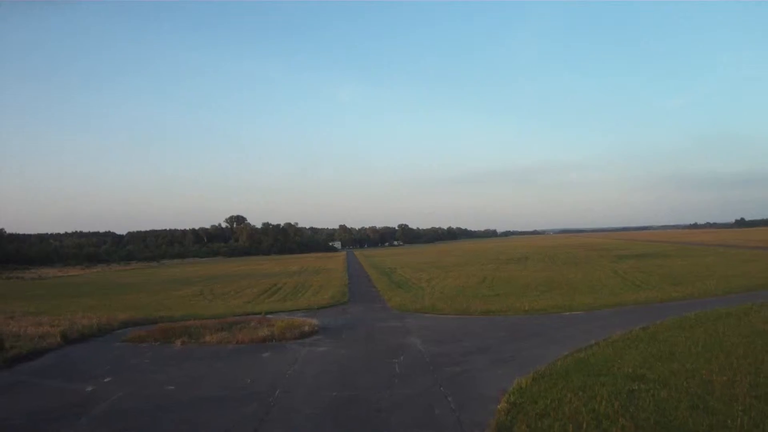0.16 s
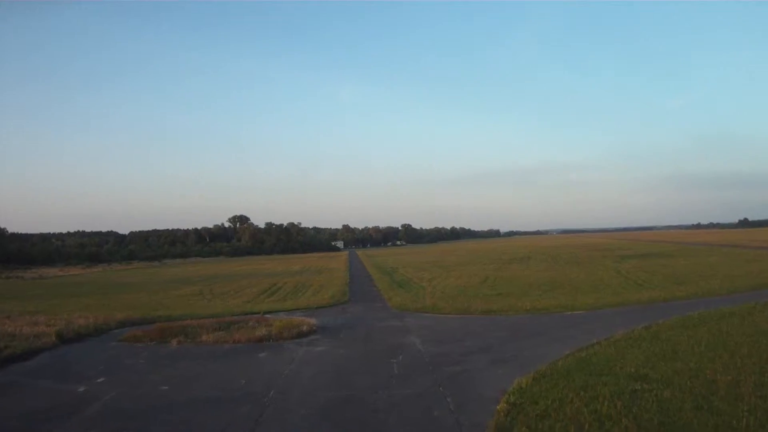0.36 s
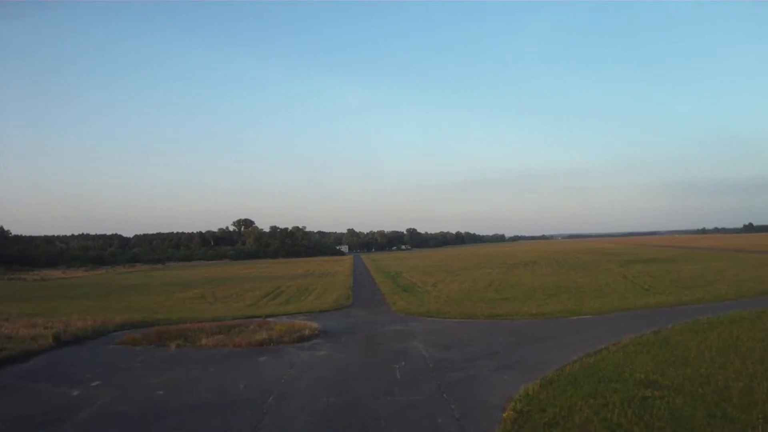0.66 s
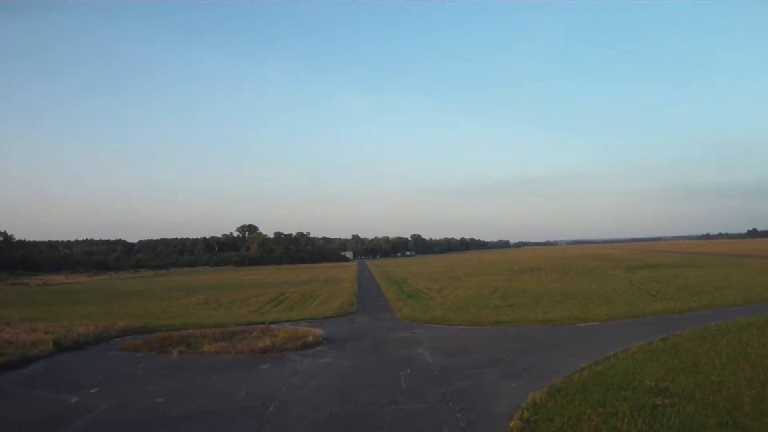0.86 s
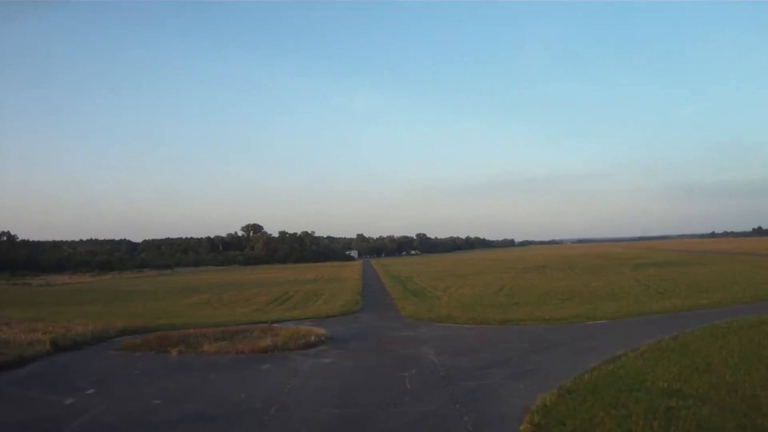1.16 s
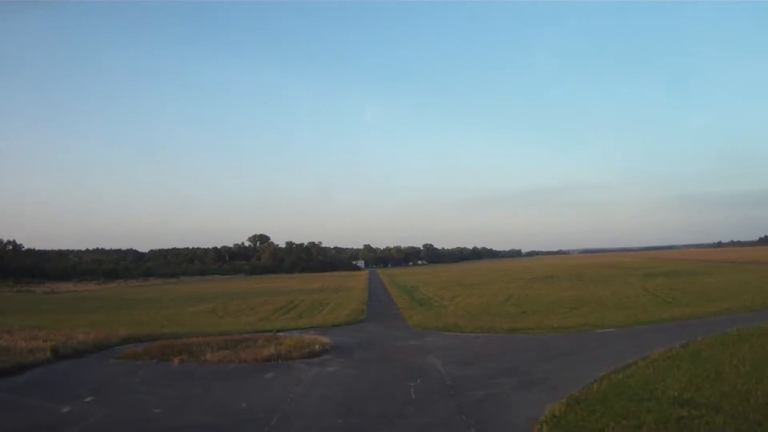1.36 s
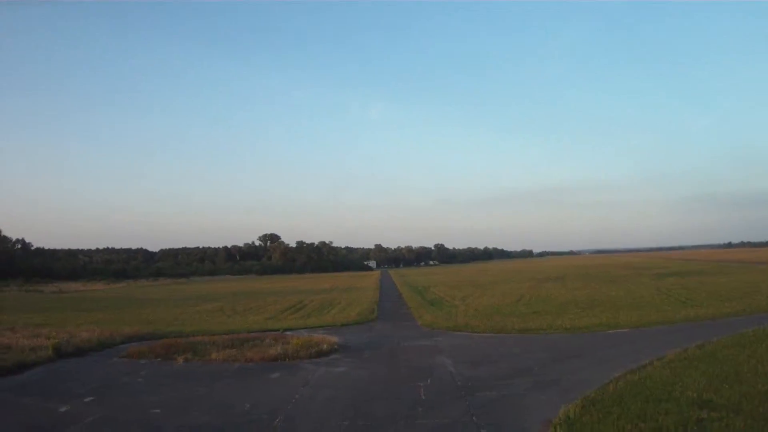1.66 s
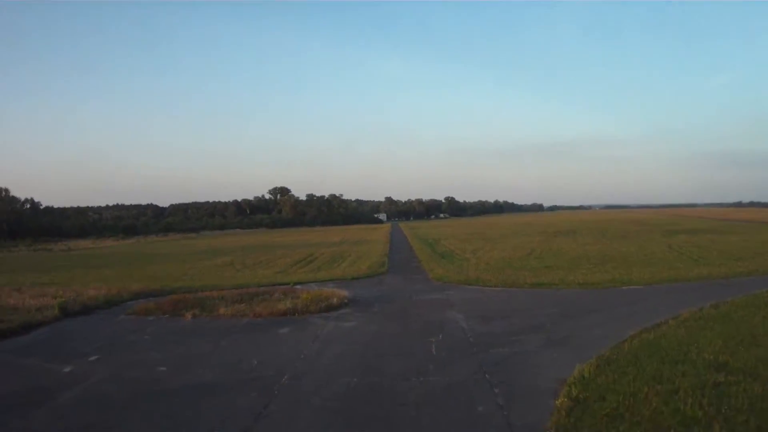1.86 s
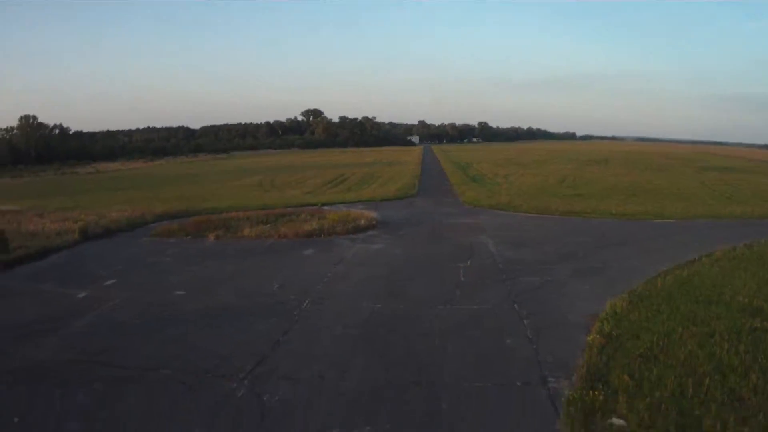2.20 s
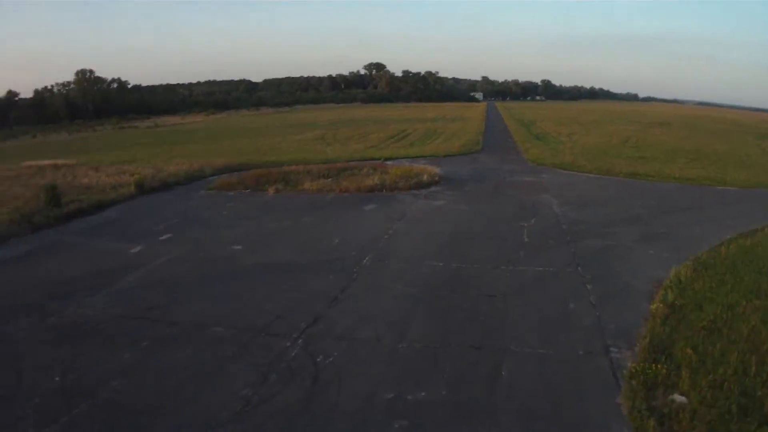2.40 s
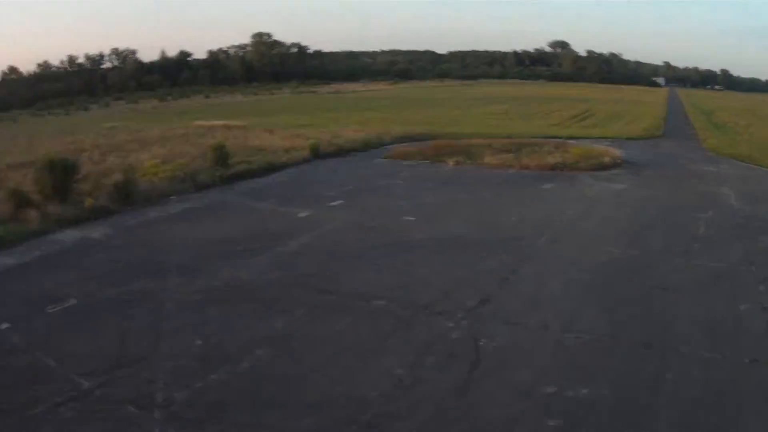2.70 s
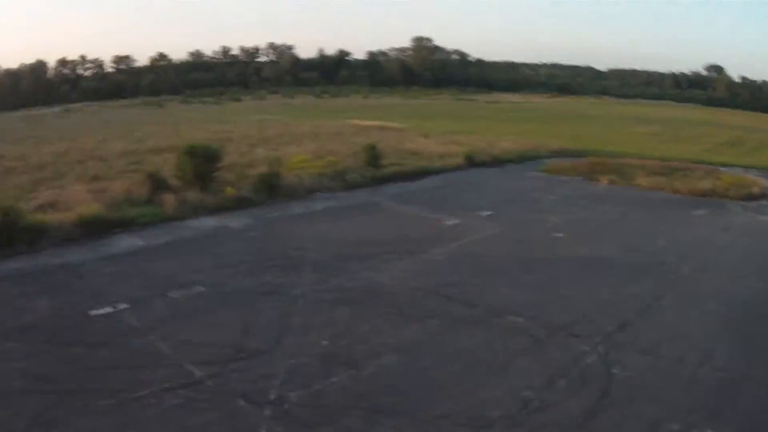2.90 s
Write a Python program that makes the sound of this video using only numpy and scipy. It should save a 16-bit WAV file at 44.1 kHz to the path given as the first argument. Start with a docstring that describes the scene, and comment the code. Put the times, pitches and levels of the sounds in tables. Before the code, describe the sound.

A small drone's propellers hum and buzz steadily, with light wind on the microphone.

```python
"""Outdoors, at the camera of a small multirotor drone that hovers, then banks into a turn.
Two-bladed rotors at slightly different speeds beat; in the turn the fast ones slow, the slow speed up.
Each rotor hums, buzzes through the frame and chops the air. The motor drives add a thin steady whine,
the motors a faint whistle in the turn. Wind rumbles on the microphone."""
import sys
import numpy as np
from scipy import signal
from scipy.fft import rfft, irfft, next_fast_len
from scipy.io import wavfile

SR = 44100
rng = np.random.default_rng(int(sys.argv[2]) if len(sys.argv) > 2 else 0)


def bounce(signal):
    """Save signal as a 16-bit WAV file at the path given by the first command-line argument."""
    frames = np.transpose(np.atleast_2d(signal))
    limited = np.clip(frames, -1, 1)
    pcm = np.round(limited * 32767).astype(np.int16)
    wavfile.write(sys.argv[1], SR, pcm)


N = 134505
TIME_S = np.arange(N) / SR

# rotor noise: t/s, buzz/dB, rush/dB, fizz/dB
NOISE_LEVELS = [(0, -24.5, -21.5, -37), (.5, -23, -22.5, -36), (1.25, -23.5, -21, -36),
                (1.8, -25, -23, -38.5), (2.1, -23.5, -23, -38.5), (2.38, -20.5, -21, -37),
                (2.58, -23.5, -25.5, -38), (2.85, -24.5, -26.5, -38.5), (3.05, -26, -21, -40)]


def amp(db):
    """dB to gain."""
    return 10 ** (np.asarray(db) / 20)


def unit(x):
    """Scale to rms 1."""
    return x / np.sqrt(np.mean(x ** 2) + 1e-20)


def curve(table, column=1):
    """Table column, linearly interpolated over time."""
    columns = np.transpose(table)
    return np.interp(TIME_S, columns[0], columns[column])


def colour(x, spectrum):
    """Filter by a spectral shape; rms 1."""
    size = next_fast_len(N)
    hz, db = np.transpose(spectrum)
    bin_hz = np.fft.rfftfreq(size, 1 / SR)
    gain = amp(np.interp(np.log(bin_hz + 1), np.log(hz + 1), db))
    return unit(irfft(rfft(x, size) * gain, size)[:N])


def drift(rate_hz, size=4096):
    """Random wander up to about rate_hz; rms 1."""
    hz = np.fft.rfftfreq(size, N / SR / size)
    slow = irfft(rfft(rng.standard_normal(size)) / np.sqrt(1 + (hz / rate_hz) ** 4))
    return np.interp(np.arange(N) * size / N, np.arange(size), unit(slow))


def wind():
    """Airflow rumbles on the microphone and rocks the camera mount at its narrow resonance."""
    # wind strength: t/s, level/dB
    levels = [(0, -42.5), (.6, -38), (1.0, -36), (1.4, -39.5), (1.9, -39), (2.5, -56), (3.05, -55)]
    # rumble shape: f/Hz, gain/dB
    spectrum = [(20, -33), (60, -7), (92, -7.5), (118, -2.5), (200, 4), (400, -6.5), (1000, -53),
                (16000, -85)]
    mount_hz, width_hz, mount_db = 103.9, 6, -8.5
    phase = 2 * np.pi * mount_hz * TIME_S
    mount = drift(width_hz) * np.cos(phase) + drift(width_hz) * np.sin(phase)
    rumble = colour(rng.standard_normal(N), spectrum)
    return amp(curve(levels)) * (rumble + amp(mount_db) * mount)


def drive_whine():
    """Steady switching tones of the motor drives."""
    # switching tones: f/Hz, level/dB
    tones = [(7601, -48), (7644, -57)]
    return sum(np.sqrt(2) * amp(db) * np.sin(2 * np.pi * hz * TIME_S + 0.55 * drift(rate_hz=16))
               for hz, db in tones)


def motor_whistle():
    """Faint wavering whistle as the motors work hardest."""
    # whistle in the turn: t/s, f/Hz, level/dB
    track = [(2.6, 14500, -88), (2.74, 14620, -52), (2.86, 14720, -44), (2.94, 14680, -50),
             (3.02, 14450, -75)]
    phase = 2 * np.pi * np.cumsum(curve(track)) / SR
    return amp(curve(track, column=2)) * np.sin(phase + drift(rate_hz=30))


def air_fizz(air, steady_share=0.47):
    """High hiss, part steady, part chopped by the blades."""
    # fizz shape: f/Hz, gain/dB
    spectrum = [(20, -57), (7000, -51), (8400, -18.5), (9900, -14.5), (10550, -5.5), (11100, -13),
                (11900, -8), (12400, -6.5), (13600, -6.5), (14100, 3), (15300, -4)]
    hiss = (1 - steady_share) * unit(air) + steady_share * rng.standard_normal(N)
    return amp(curve(NOISE_LEVELS, column=3)) * colour(hiss, spectrum)


def blade_chop(turns, sharpness=1.05, mismatch=0.097):
    """One puff of turbulent air per blade, one blade slightly stronger."""
    puffs = np.exp(sharpness * np.cos(2 * np.pi * 2 * turns))
    imbalance = 1 + mismatch * np.cos(2 * np.pi * turns)
    return unit(puffs * imbalance * rng.standard_normal(N))


def frame_buzz(turns, odd_db=-3, roughness=0.6, throb=0.28):
    """Frame vibration repeating every shaft turn; even orders lead."""
    orders, size = np.arange(64), 2048
    partials = amp(odd_db * (orders % 2)) * np.exp(2j * np.pi * rng.random(len(orders))) * (orders > 0)
    shake = unit(np.interp(turns % 1, np.arange(size) / size, irfft(partials, size)))
    return shake * (1 + roughness * drift(rate_hz=51)) * (1 + throb * np.cos(2 * np.pi * turns))


def buzz_and_rush(frame, air, split_hz=2600):
    """Frame buzz and rushing air, each coloured; the treble follows its own level."""
    # frame response: f/Hz, gain/dB
    buzz_spectrum = [(300, -47), (800, -28), (1000, -38), (1180, -9.5), (1330, -14.5), (1480, -1),
                     (1620, -10.5), (1800, 0.5), (2130, 3.5), (2400, -3), (2650, -24), (2950, -21.5),
                     (3500, -17.5), (4300, -10.5), (4900, -20.5), (6000, -17.5), (6600, -32.5), (9000, -55),
                     (16000, -60)]
    # turbulence shape: f/Hz, gain/dB
    rush_spectrum = [(20, -27), (60, -31), (110, -8.5), (250, -12), (470, -1.5), (570, 6), (700, 4),
                     (810, -11), (980, -18.5), (1300, -13), (1600, -4.5), (2150, 2.5), (2420, -6),
                     (2730, -22.5), (3200, -15), (3650, -18.5), (4250, -8.5), (4900, -21), (5800, -18),
                     (6500, -26.5), (7400, -22), (8100, -35.5), (9500, -65), (16000, -67)]
    # treble above split_hz: t/s, gain/dB
    treble = [(0, 0.5), (1.5, 0), (1.9, -.5), (2.3, -1), (2.6, 0), (3.05, -2)]
    buzz = amp(curve(NOISE_LEVELS, column=1)) * colour(frame, buzz_spectrum)
    rush = amp(curve(NOISE_LEVELS, column=2)) * colour(air, rush_spectrum)
    both = buzz + rush
    body = signal.sosfiltfilt(signal.butter(6, split_hz, fs=SR, output="sos"), both)
    return body + amp(curve(treble)) * (both - body)


def rotor_hum(turns, blade_hz, partial_db, swell_db):
    """Shaft orders fluttering with uneven blade loading; the frame resonance favours the octave."""
    # orders 8 and up, fading in the turn: t/s, gain/dB
    overtones = [(0, 0.5), (.3, 3.5), (1.55, 1.5), (1.8, -6), (2.15, -0.5), (2.45, 0), (2.6, -3),
                 (3.05, -9)]
    # multiples of the shaft rate (2 = blade tone, 4 = its octave)
    shaft_orders = [2, 3, 4, 5, 6, 8, 10, 20, 30]
    frame_hz, width_hz, off_resonance_db = 605.7, 94, -10.5
    flutter_hz = 34.6
    resonance = 1 / (1 + ((2 * blade_hz - frame_hz) / width_hz * 2) ** 2)
    hum = np.zeros(N)
    for order, db in zip(shaft_orders, partial_db):
        db = db + swell_db.get(order, 0)
        depth = 0.091 if order == 2 else 0.2
        if order == 4:
            db = db + off_resonance_db * (1 - resonance)
        if order >= 8:
            db, depth = db + curve(overtones), 0.4
        phase = 2 * np.pi * order * turns
        in_phase = 1 + depth * drift(flutter_hz)
        quadrature = depth * drift(flutter_hz)
        hum += amp(db) * (in_phase * np.cos(phase) + quadrature * np.sin(phase))
    return -np.sqrt(2) * hum


def rotors():
    """Five beating rotors, each with hum, buzz and chopped air; gusts shake the shafts."""
    # lead rotor: t/s, blade-pass f/Hz
    lead = [(0, 297), (.09, 294.5), (0.169, 300.3), (0.291, 294), (0.399, 295.5), (.6, 294.2), (1.0, 294.7),
            (1.12, 293.7), (1.211, 297), (1.31, 292.7), (1.42, 294.7), (1.51, 292.7), (1.599, 296.5),
            (1.81, 292.5), (1.9, 294), (2.01, 291.5), (2.13, 293), (2.22, 298), (2.33, 291), (2.42, 290.5),
            (2.52, 283), (2.64, 268.5), (2.8, 264), (2.921, 259.5), (3.05, 264)]
    # its shaft orders 2, 4 and 5: t/s, gain/dB
    lead_tone = [(0, -23), (1.3, -22.5), (1.8, -23), (2.3, -27), (2.75, -26), (3.05, -31)]
    lead_octave = [(0, -19.5), (.45, -20), (.9, -19.5), (1.02, -25.5), (1.3, -21), (1.52, -22.5),
                   (1.64, -16.5), (1.82, -19), (2.0, -14), (2.15, -14.5), (2.33, -26), (2.43, -13.5),
                   (2.55, -14), (2.7, -14.5), (3.05, -19.5)]
    lead_order5 = [(0, 1.5), (.9, 1), (1.1, 4.5), (1.55, 4), (1.8, -3), (2.15, -6), (2.33, 6), (2.5, -6),
                   (3.05, -14)]
    # other rotors: t/s, blade-pass f/Hz, octave gain/dB
    second = [(0, 301, -22), (.6, 300, -6), (1.0, 298, -8), (1.22, 303, -9), (1.6, 298.9, -16),
              (2.0, 296.2, -21), (2.2, 304.1, -7), (2.339, 292.4, -17), (2.48, 287.6, -13),
              (2.61, 280.1, 11), (2.76, 279.3, -6), (3.05, 276.9, -4)]
    third = [(0, 279.7, -4.5), (.5, 278.8, -2), (1.25, 277.5, -5), (1.7, 274.4, -2), (2.1, 273, -15),
             (2.4, 275, -8), (2.551, 283.2, 5.5), (2.661, 295, 2.5), (2.85, 302.5, 7.5), (2.941, 299.2, 5),
             (3.0, 294, -3.5), (3.05, 284.4, -4)]
    fourth = [(0, 274.3, -2), (0.601, 269.8, 7), (1.498, 270.9, 0), (1.9, 264.7, -8), (2.249, 267.6, 2),
              (2.499, 281.4, -11), (2.682, 288.1, -2), (2.801, 297.1, 8), (2.93, 297, 0), (3.05, 282.5, 9)]
    fifth = [(0, 249.9, -29), (.8, 250.5, 6), (1.4, 242, 9), (2.2, 232.1, -6), (2.42, 241.4, 12),
             (2.62, 261.9, -6), (2.848, 277, -6), (3.05, 272.6, -9)]
    # hum, row per rotor: base level/dB per shaft order
    partials = [(-1.5, -38, 3, -31.5, -41.5, -45, -42.5, -47.5, -42),
                (-42.5, -47, -25.5, -39, -50.5, -42, -44.5, -65, -54),
                (-33, -50, -20, -32, -47.5, -64, -58, -76, -53),
                (-46, -48.5, -40.5, -35, -56, -60, -52, -64, -55),
                (-44.5, -50.5, -36, -38.5, -56, -68, -61, -65, -68)]
    # noise weights, row per rotor: buzz/dB, air/dB
    shares = [(1, -1.5), (1, -5.5), (0.5, -4), (-1.5, 3.5), (5.5, -7.5)]
    gust_turns, gust_hz = 0.0084, 12.1
    hum, frame, air = np.zeros((3, N))
    for rotor, partial_db, (buzz_db, air_db) in zip([lead, second, third, fourth, fifth], partials, shares):
        blade_hz = curve(rotor)
        turns = np.cumsum(blade_hz / 2) / SR + gust_turns * drift(gust_hz)
        if rotor is lead:
            swell_db = {2: curve(lead_tone), 4: curve(lead_octave), 5: curve(lead_order5)}
        else:
            octave_db = curve(rotor, column=2)
            swell_db = {4: octave_db, 5: 0.54 * octave_db}
        hum += rotor_hum(turns, blade_hz, partial_db, swell_db)
        frame += amp(buzz_db) * frame_buzz(turns)
        air += amp(air_db) * blade_chop(turns)
    return hum + buzz_and_rush(frame, air) + air_fizz(air)


def scene():
    """Drone and wind, mono."""
    return (rotors() + drive_whine() + motor_whistle() + wind())[None]


def record(dry):
    """A deep treble notch near 9 kHz, then the camera's band limit."""
    notch_hz, width_hz, notch_db, cutoff_hz = 8920, 340, -50, 15350
    hz = np.fft.rfftfreq(N, 1 / SR)
    notch = amp(notch_db * np.exp(-2 * ((hz - notch_hz) / width_hz) ** 2))
    notched = irfft(rfft(dry) * notch, N)
    lowpass = signal.firwin(1023, cutoff_hz, window=("kaiser", 9), fs=SR)
    return signal.oaconvolve(notched, lowpass[None], "same")


dry = scene()
out = record(dry)
bounce(out)
```